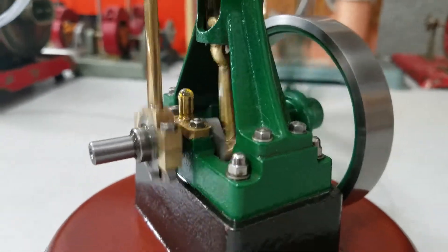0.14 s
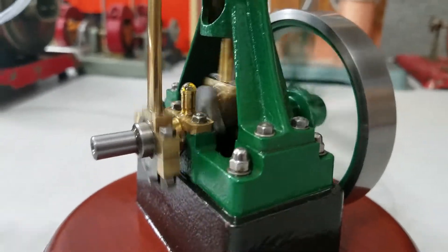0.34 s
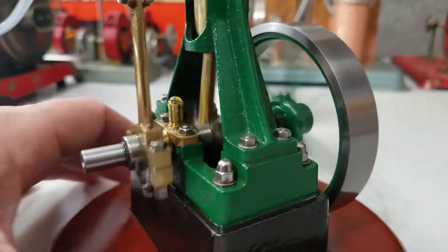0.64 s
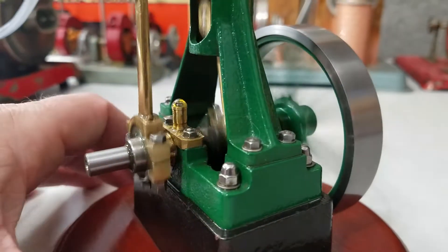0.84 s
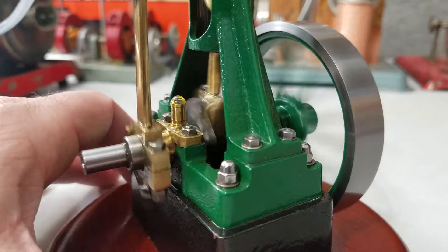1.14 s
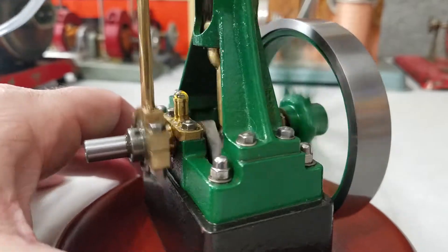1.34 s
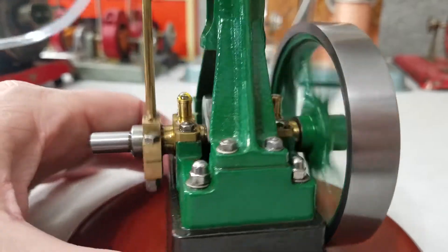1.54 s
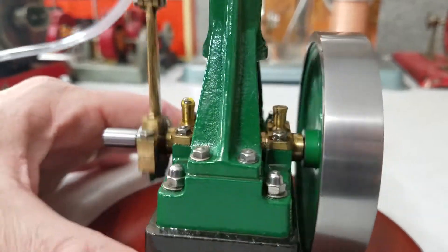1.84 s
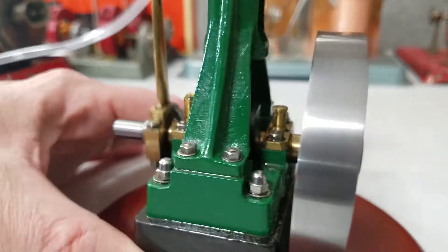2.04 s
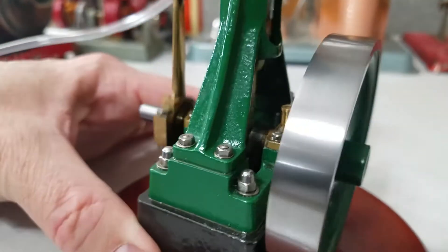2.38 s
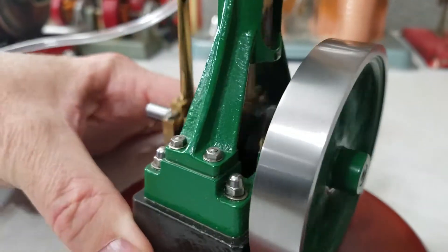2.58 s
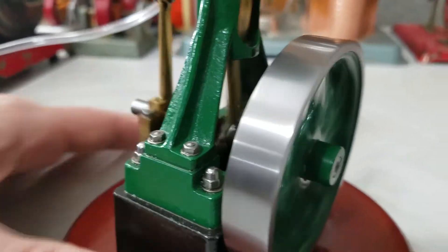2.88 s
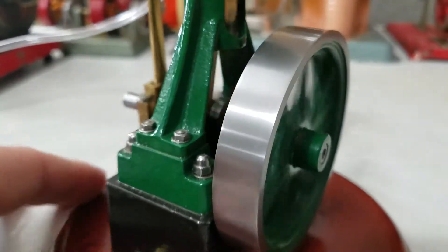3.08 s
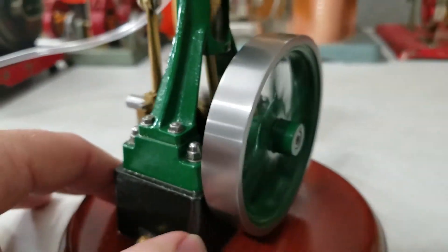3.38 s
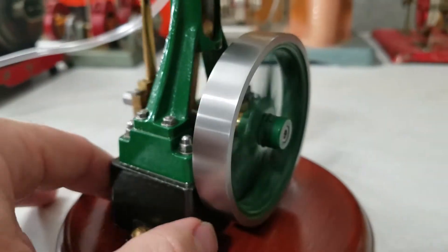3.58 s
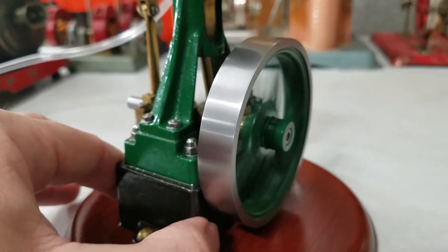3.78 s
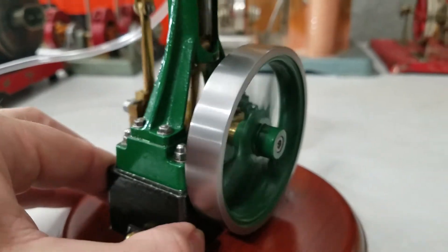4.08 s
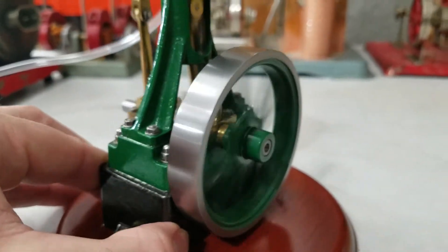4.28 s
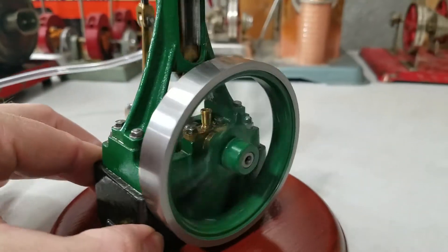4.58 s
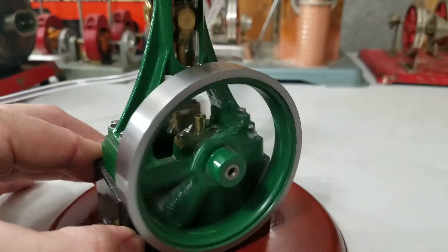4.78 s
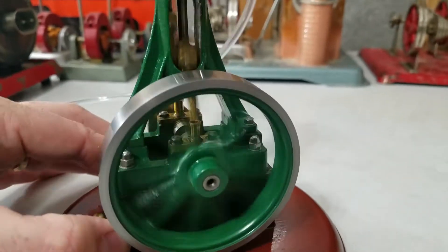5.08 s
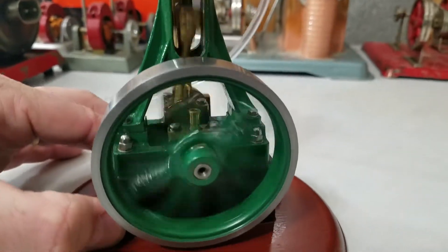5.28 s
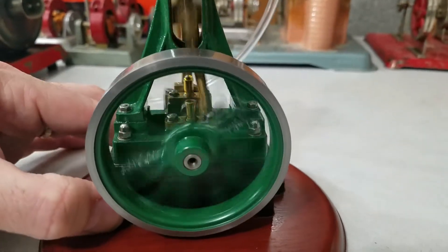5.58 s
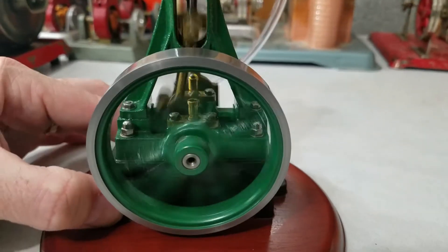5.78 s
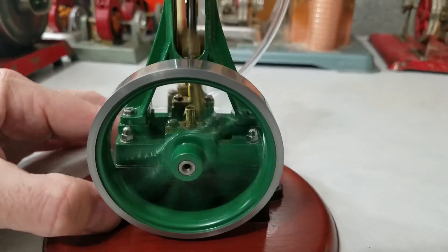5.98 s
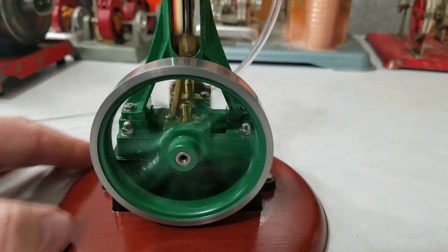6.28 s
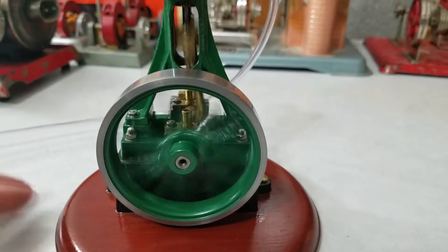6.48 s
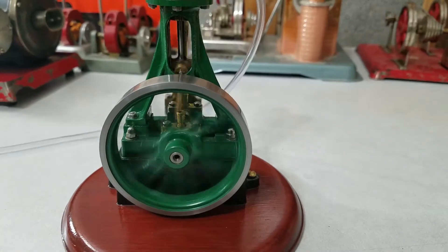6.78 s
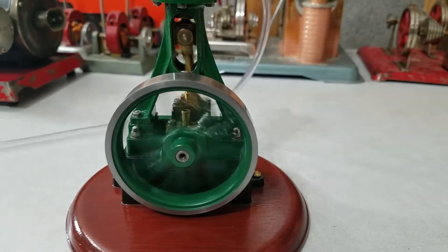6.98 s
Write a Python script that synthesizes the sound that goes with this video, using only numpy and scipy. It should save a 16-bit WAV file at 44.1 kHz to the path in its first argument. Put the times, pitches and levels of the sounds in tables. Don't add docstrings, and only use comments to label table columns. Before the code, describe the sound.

Small air-driven engine chuffs rapidly with bright hissing puffs, about fifteen a second, while a soft wind thump buffets the left side near two seconds.

```python
import sys
import numpy as np
from scipy import signal
from scipy.fft import rfft, irfft
from scipy.io import wavfile

SR = 44100
rng = np.random.default_rng(int(sys.argv[2]) if len(sys.argv) > 2 else 0)


def persist_wave(psi):
    counts = np.round(np.clip(psi, -1, 1) * 32767).astype(np.int16)
    wavfile.write(sys.argv[1], SR, np.atleast_2d(counts).T)


def invert_db(level):
    return 10 ** (np.asarray(level, dtype=float) / 20)


N = 314433


def rms_one(x):
    return x / np.sqrt(np.mean(np.abs(x) ** 2) + 1e-20)


def in_time(rows):
    s, *columns = np.transpose(rows)
    return [np.interp(np.arange(N) / SR, s, column) for column in columns]


def at_hz(points, hz):
    known_hz, value = np.array(points)[:, :2].T
    return np.interp(np.log(hz), np.log(known_hz), value)


def per_facing(rows, hz):
    return np.array([at_hz(np.array(rows)[:, [0, k + 1]], hz) for k in range(3)])


def drift(rate):
    r = np.exp(-80 * np.pi * rate / SR)
    slow = signal.lfilter([1], [1, -2 * r, r * r], rng.standard_normal(N // 40 + 2002))[2000:]
    return np.interp(np.arange(N) / 40, np.arange(len(slow)), rms_one(slow))


def late(x):
    return np.roll(x, 8)


def passes(turns, share):
    return np.flatnonzero(np.diff(np.floor(turns - share)))


def workshop():
    # frequency in Hz, noise level in dB per Hz.
    floor = [(15, -41), (25, -16), (54, -4.5), (120, 1), (222, -1), (300, -17), (363, -2), (432, -28.5),
             (566, -0.5), (1100, -10), (1430, -6.5), (2420, -120)]
    hz = np.maximum(np.arange(N // 2 + 1) * SR / N, 1)
    shape = invert_db(at_hz(floor, hz))
    mid, side = rms_one(irfft(rfft(rng.standard_normal((2, N))) * shape, N))
    hum_hz, hum_db = 119.8, -49.5
    hum = invert_db(hum_db + .6 * drift(3)) * np.sin(2 * np.pi * hum_hz * np.arange(N) / SR)
    return invert_db(-50) * (mid + 0.13 * side * [[1], [-1]]) + hum


def slide():
    band = signal.butter(2, [380, 1200], "band", fs=SR, output="sos")
    rub = rms_one(signal.sosfilt(band, rng.standard_normal(N)))
    start_s, attack_s, hold_s, release_s = 1.37, 0.045, 0.091, 0.22
    corners = np.cumsum([start_s, attack_s, hold_s, release_s])
    push = np.interp(np.arange(N) / SR, corners, [0, 1, 1, 0]) ** 2
    return push * invert_db(-47 + 6.1 * drift(60)) * rub


def draught():
    t = np.arange(N) / SR
    gust_s, gust_peak_db, rise_db_per_s, fall_db_per_s = 1.81, -20.5, 65, 36
    sheltered_db, calm_db = -52, -64
    brushed_db, brush_ends_s, brush_fall_db_per_s = -47, 1.35, 70
    gust_db = gust_peak_db + np.minimum(rise_db_per_s * (t - gust_s), fall_db_per_s * (gust_s - t))
    left = np.maximum(gust_db, np.where(t < gust_s, sheltered_db, calm_db))
    right = np.maximum(brushed_db - brush_fall_db_per_s * np.maximum(t - brush_ends_s, 0), calm_db)
    return np.array([left, right])


def wind(turns):
    # time in seconds, peak in dB, frequency in Hz.
    sweep_eddies = [(1.616, -15, 112), (1.694, -30, 106), (1.746, -3, 320), (1.754, 0, 233),
                    (1.761, -3, 169), (1.774, -17, 146), (1.807, -12, 230), (1.815, -12, 298),
                    (1.837, -11.5, 149), (1.871, -1.5, 209), (1.882, -2.5, 230), (1.897, -5, 282),
                    (1.906, -12, 127), (1.922, -22, 132.5), (1.939, -7, 182), (1.957, -9, 193),
                    (1.976, -17, 135), (2.0, -12, 111), (2.018, -11, 122), (2.031, -16, 146),
                    (2.063, -9, 141), (2.074, -15, 143), (2.088, -17, 88.7), (2.122, -23, 103),
                    (2.201, -18, 96), (2.316, -22, 80), (2.338, -23, 72), (1.758, -12, 61.4),
                    (1.877, -11, 60.4)]
    # share of the turn, time in seconds when these end, peak in dB, frequency in Hz.
    brush = [
        (1, 1.4, -28.5, 71),
        (0.46, .55, -27, 80),
    ]
    eddies = [(s, peak_db, hz, 0) for s, peak_db, hz in sweep_eddies]
    for share, until, peak_db, hz in brush:
        at = passes(turns, share) / SR
        scatter = rng.standard_normal((80, 2))
        for s, (a, b) in zip(at, scatter):
            if s < until:
                eddies.append((s, peak_db + 2 * a, hz * invert_db(b), 1))

    puffs, span = np.zeros((2, N)), np.arange(-1500, 1500)
    for (s, peak_db, hz, port), phase in zip(eddies, rng.uniform(0, 2 * np.pi, (80, 2))):
        cycles = span * hz / SR
        push = np.exp(-(cycles / .6) ** 2) * np.sin(2 * np.pi * cycles + phase[0])
        core = np.exp(-(cycles / .45) ** 2) * np.sin(2.1 * 2 * np.pi * cycles + phase[1])
        puffs[port, round(s * SR) + span] += invert_db(peak_db) * (push + invert_db(-9.5) * core)
    puffs = signal.sosfilt(signal.butter(1, 30, "high", fs=SR, output="sos"), puffs)

    band = signal.butter(2, [35, 190], "band", fs=SR, output="sos")
    lumps = invert_db(5.5 * np.array([drift(28), drift(25)]))
    rumble = rms_one(signal.sosfilt(band, lumps * rng.standard_normal((2, N))))
    air = puffs + invert_db(draught()) * rumble
    return .82 * np.tanh(air / .82)


def thuds(turns):
    # share of the turn, peak in dB, frequency in Hz, time in seconds to fade by 60 dB.
    knocks = [
        (0.356, -43.5, 124, 0.048),
        (0.442, -38, 195, 0.044),
        (0.489, -45.5, 360, 0.029),
        (0.893, -47, 122, 0.084),
        (0.964, -36.5, 210, 0.028),
        (0.983, -38.5, 370, 0.034),
        (0.029, -38.5, 167, 0.033),
        (0.969, -41.5, 500, 0.012),
    ]
    out = np.zeros(N)
    for share, peak_db, hz, t60 in knocks:
        at = passes(turns, share)
        clicks = np.full(N, 1e-18)
        clicks[at] = invert_db(peak_db + 1.5 + 1.2 * rng.standard_normal(80)[:len(at)])
        r, w = invert_db(-60 / (t60 * SR)), 2 * np.pi * hz / SR
        out += signal.lfilter([0, np.sin(w)], [1, -2 * r * np.cos(w), r * r], clicks)
    soft = signal.butter(2, 1000, fs=SR, output="sos")
    return signal.sosfilt(soft, out)


def valve(turns):
    # valve opens and valve shuts as shares of the turn, peak flow in dB,
    # closing taper as a share of the turn.
    strokes = [
        (0.98, .368, 1.36, 0.048),
        (0.45, 0.881, 3, 0.07),
    ]
    snap_turn, settle_turn, drain_turn = 0.024, 0.078, 0.021
    leak_db = -32
    points = []
    for opens, shuts, peak_db, taper in strokes:
        peak_at = opens + 0.49 * ((shuts - opens) % 1)
        points += [(opens, leak_db), (opens + snap_turn, peak_db - 5.5), (opens + settle_turn, peak_db - 2),
                   (peak_at, peak_db), (shuts - taper, peak_db - 1.5),
                   (shuts, -11), (shuts + drain_turn, leak_db)]
    return np.interp(turns, *np.transpose(points), period=1)


def nearby(jet, blend):
    # port (0 left, 1 right), delay in ms at each of the three
    # facings, level in dB.
    echoes = [(0, 0.2, 0.2, 0.18, -12), (1, 0.179, 0.21, 0.18, -11), (0, 0.63, 0.287, 0.324, -32),
              (0, 0.65, 0.83, 0.77, -13.5), (1, 0.575, 0.484, 0.465, -15.5), (1, 0.69, 0.73, 1.39, -25)]
    out = jet.copy()
    for port, *delay_ms, echo_db in echoes:
        then = np.arange(N) - delay_ms @ blend * SR / 1000
        out[round(port)] += invert_db(echo_db) * np.interp(then, np.arange(N), jet[round(port)])

    clutter_db, clutter_t60_s, hold = -7, .025, 11000
    t = np.arange(1400) / SR
    fading = invert_db(-60 * t / clutter_t60_s) * (t > .0007)
    window = np.sin(np.pi * np.arange(2 * hold) / (2 * hold))
    padded = np.pad(jet, [(0, 0), (hold, 2 * hold)])
    clutter = np.zeros((2, N + 4 * hold))
    for i in range(0, N + hold, hold):
        pattern = fading * rng.standard_normal((2, len(t)))
        piece = padded[:, i:i + 2 * hold] * window
        clutter[:, i:i + 2 * hold + len(t) - 1] += signal.fftconvolve(piece, pattern, axes=1)
    return out + invert_db(clutter_db) * clutter[:, hold:hold + N] / np.sqrt(np.sum(fading ** 2))


def exhaust(turns):
    # time in seconds, facing (0 side on, 1 half turned, 2 flywheel on),
    # level in dB, left minus right in dB.
    turning = [
        (0, .01, -1.1, -0.8),
        (1.2, 0.053, 0, 1.8),
        (1.8, 0.44, 0.74, 1.3),
        (2.6, 0.53, -0.25, 5),
        (3.4, 1.07, -1.3, 6),
        (3.85, 1.14, -1.2, 5.5),
        (4.6, 1.21, -1.24, 6.5),
        (5.1, 1.735, 0.95, 5),
        (7.13, 1.836, -0.7, 3),
    ]
    # frequency in Hz, level in dB.
    room_tail = [(500, -0.5), (1500, -6.5), (3000, -7.5), (6000, -12), (12000, -16)]
    # frequency in Hz, width in Hz,
    # then left dB and right dB for each of the three facings.
    jet_modes = [(783, 1140, -47.5, -64, -48, -42.5, -45, -56), (1260, 103, -68.5, -56.5, -52, -44.5, -54, -48),
                 (1671, 182, -37, -48, -36, -33, -35.5, -54.5), (1954, 266, -32, -37, -37, -37, -34.5, -31.5),
                 (2260, 210, -52, -38, -38.5, -34, -41.5, -34.5),
                 (2972, 285, -25.5, -22, -27.5, -25.5, -52, -16), (3555, 930, -28, -79, -31.5, -74, -36, -33.5),
                 (4444, 286, -27.5, -31, -30, -30, -31.5, -30.5),
                 (5020, 560, -30.5, -32.5, -68, -23.5, -37, -45),
                 (5680, 410, -48, -36, -40, -56, -62, -42.5),
                (6470, 960, -36.5, -28.5, -35.5, -29.5, -49.5, -70),
                (6840, 830, -34.5, -38, -40.5, -33, -46, -38.5),
                (7590, 1300, -33.5, -29, -39, -38, -40.5, -37),
                (9300, 1060, -36, -30.5, -42.5, -33.5, -49, -41.5),
                (10480, 560, -36, -39, -38.5, -51, -39.5, -57),
                (12180, 780, -22, -21.5, -25, -23.5, -43, -38), (12770, 430, -26, -24, -26, -32, -34, -44),
                (13260, 1260, -39, -22, -24.5, -31, -31, -38), (15170, 3900, -23, -35, -27, -25, -39, -37)]
    # frequency in Hz, likeness from 0 to 1 for each of the three facings.
    likeness = [(750, .75, .8, .74), (2300, .8, .8, .72), (3000, .9, .9, .72), (4800, .84, .8, .76),
                (6200, .7, .72, .5), (10000, .68, .7, .5), (12000, .88, .88, .58), (15000, .74, .76, .5)]
    # frequency in Hz, phase in radians for each of the three facings.
    port_phase = [(1000, .2, -.1, .3), (1900, 1.0, .15, 1.4), (3000, -.1, -.2, -.8), (3600, .2, -.2, -2.0),
                  (4500, 2.3, 1.0, 2.0), (7000, .8, -.5, .1), (9300, .45, -1.5, -1.5),
                  (13000, .6, -1.35, -.7)]
    facing, level_db, pan_db = in_time(turning)
    blend = np.array([np.interp(facing, range(3), one) for one in np.eye(3)])

    stroke = (2 * turns + .15).astype(int)
    stroke_db = .3 * rng.standard_normal(200)[stroke]
    flutter_db = .7 * drift(70)
    flow = invert_db(valve(turns) + stroke_db + flutter_db) ** 2
    room_t60_s = 0.19
    fade = invert_db(-120 / (room_t60_s * SR))
    tail = signal.lfilter([1 - fade], [1, -fade], flow, zi=[.6])[0]

    white, out = rng.standard_normal((2, 2, N)), np.zeros((2, N))
    for k, (hz, width_hz, *beam_db) in enumerate(jet_modes):
        pole = np.exp((2j * hz - 1.55 * width_hz) * np.pi / SR)
        ringing = signal.lfilter([1], [1, -2 * pole, pole ** 2], white[k % 2])
        jet, other = np.sqrt(2) * rms_one(ringing)
        alike = np.clip(1.065 * per_facing(likeness, hz), 0, 1)
        turned = alike * np.exp(1j * per_facing(port_phase, hz))
        shared = turned @ blend * late(jet)
        right = shared.real + np.sqrt(1 - alike ** 2) @ blend * other.real
        gate = np.sqrt(flow + invert_db(at_hz(room_tail, hz)) ** 2 * tail)
        gate *= invert_db(0.98 * rng.standard_normal(200))[stroke]
        beam = invert_db(np.reshape(beam_db, (3, 2)).T) @ blend
        out += beam * gate * [jet.real, right]
    return nearby(out, blend) * invert_db(level_db - 1.83 + np.array([pan_db, -pan_db]) / 2)


def scene():
    # time in seconds, speed in turns per second.
    speed = [(0, 7.5207), (1, 7.5206), (2.4, 7.7092), (3.4, 7.7022), (5.5, 7.8324), (7.13, 7.631)]
    turns = .1451 + np.cumsum(in_time(speed)[0]) / SR
    knock = thuds(turns) + slide()
    return exhaust(turns) + np.array([knock, late(knock)]) + wind(turns) + workshop()


def top_cut(x):
    return signal.sosfilt(signal.butter(12, 17100, fs=SR, output="sos"), x)


def record(dry):
    top = signal.ellip(12, .5, 65, 15750, fs=SR, output="sos")
    mix = signal.sosfilt(top, dry)
    return top_cut(mix)


dry = scene()
out = record(dry)
persist_wave(out)
```